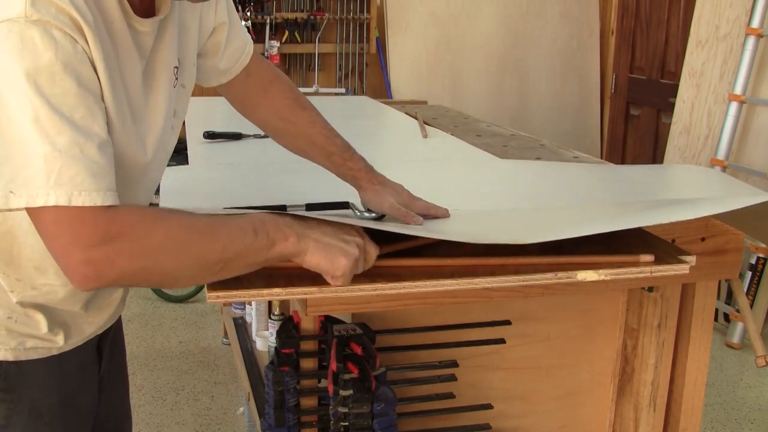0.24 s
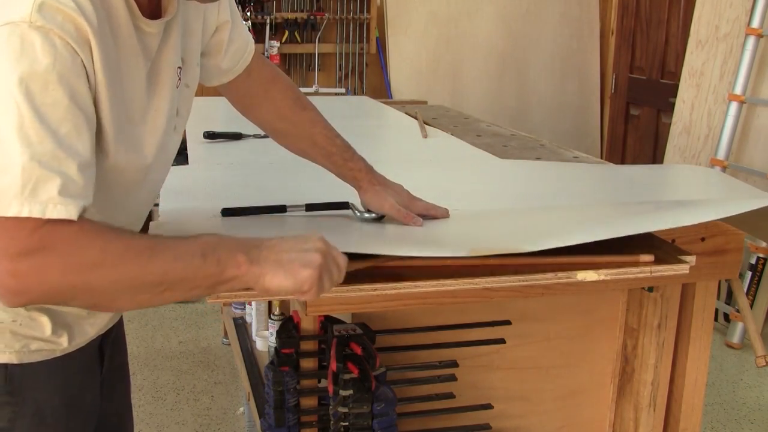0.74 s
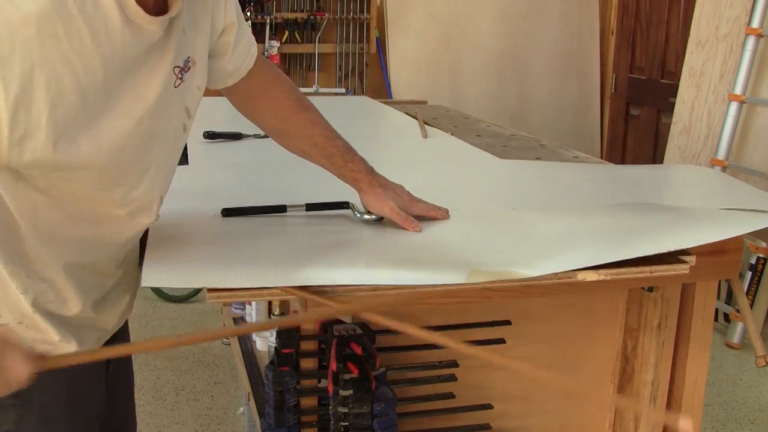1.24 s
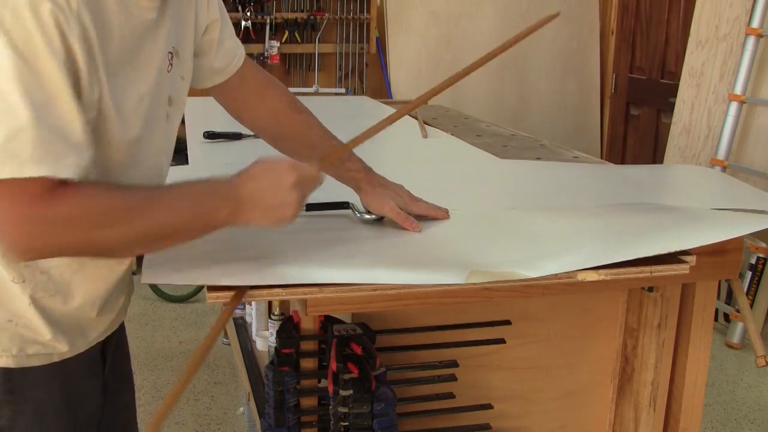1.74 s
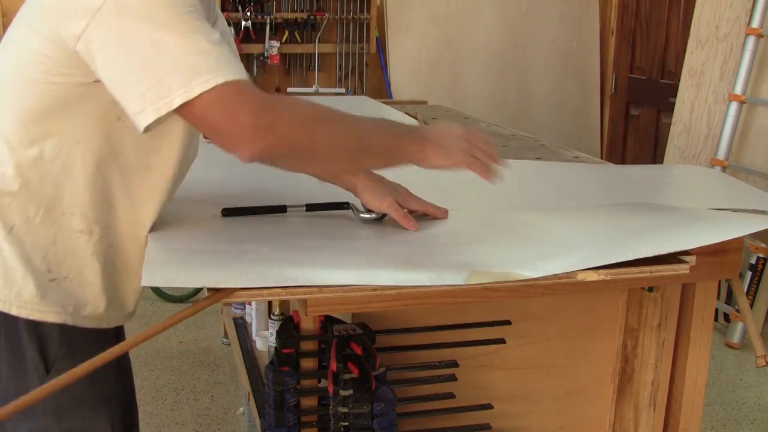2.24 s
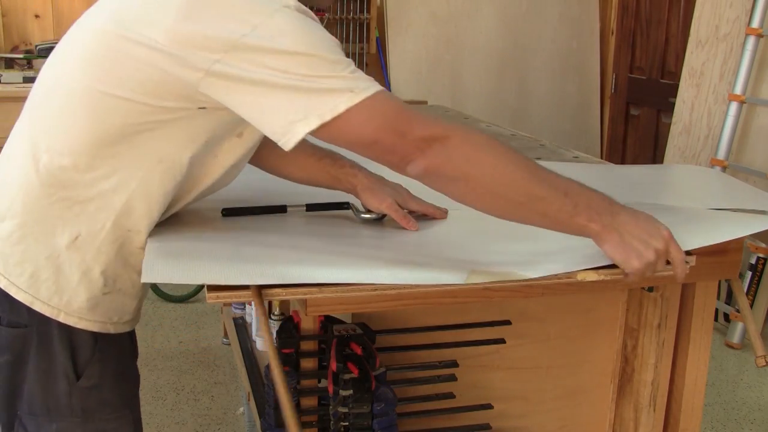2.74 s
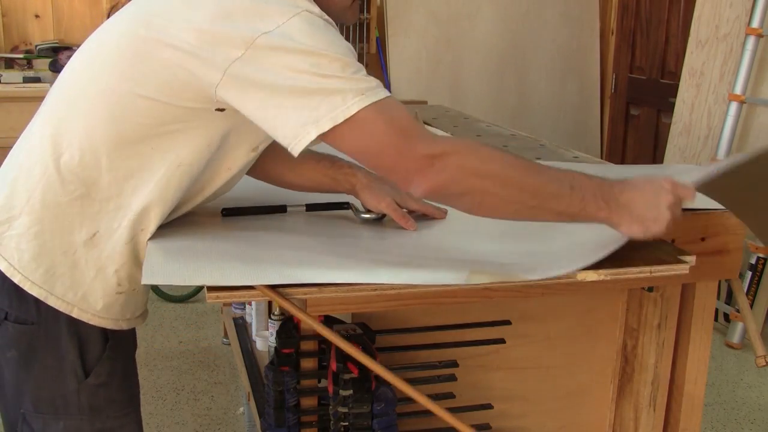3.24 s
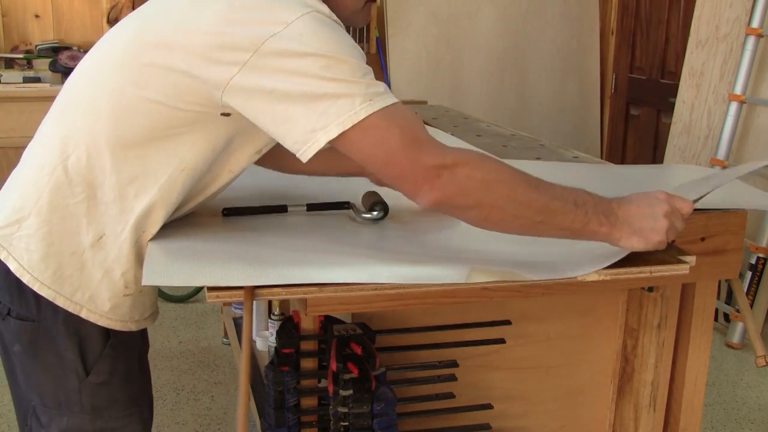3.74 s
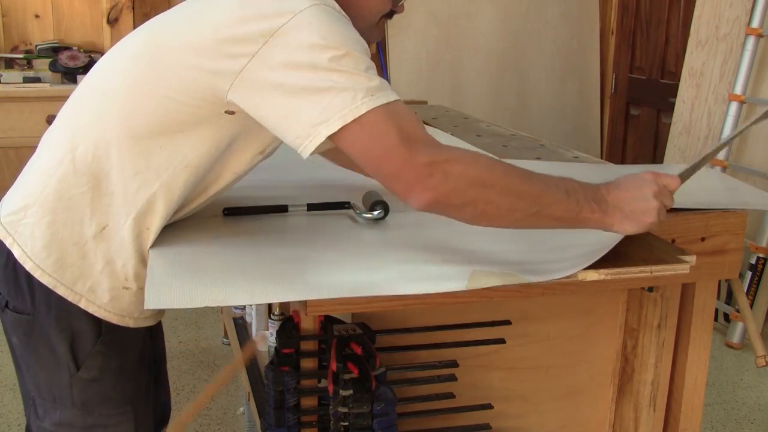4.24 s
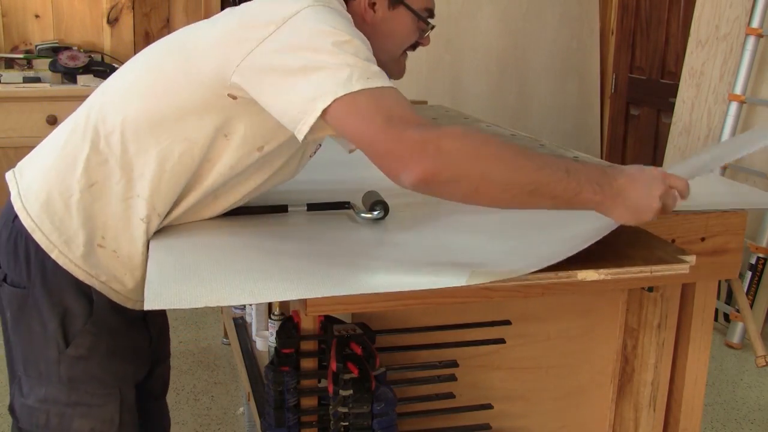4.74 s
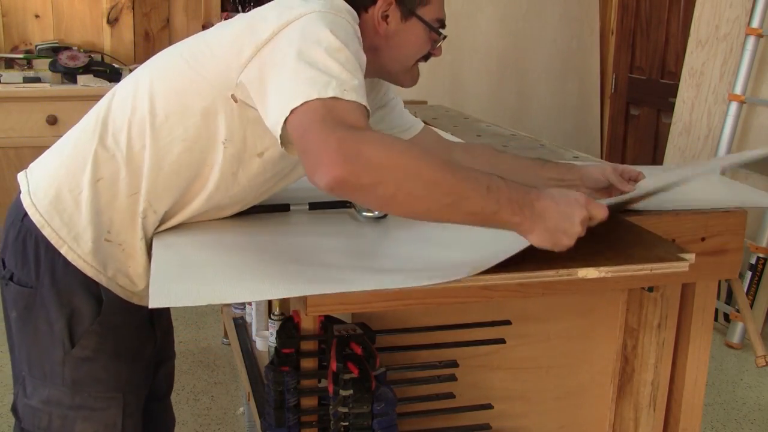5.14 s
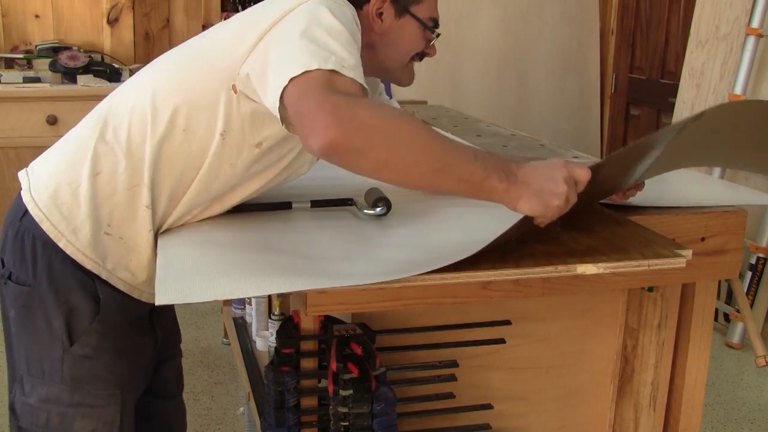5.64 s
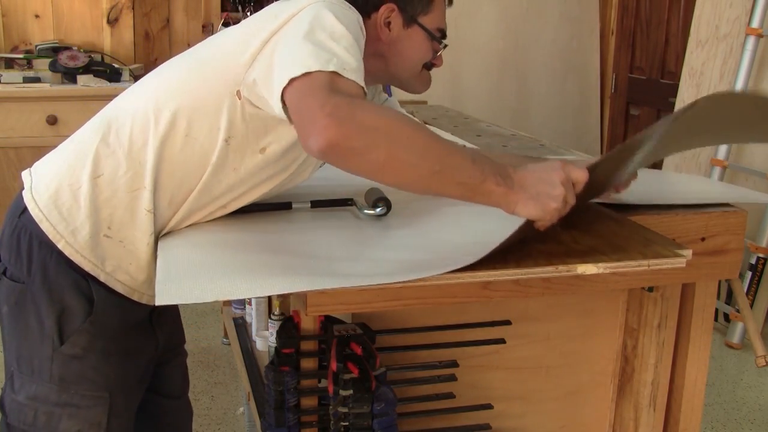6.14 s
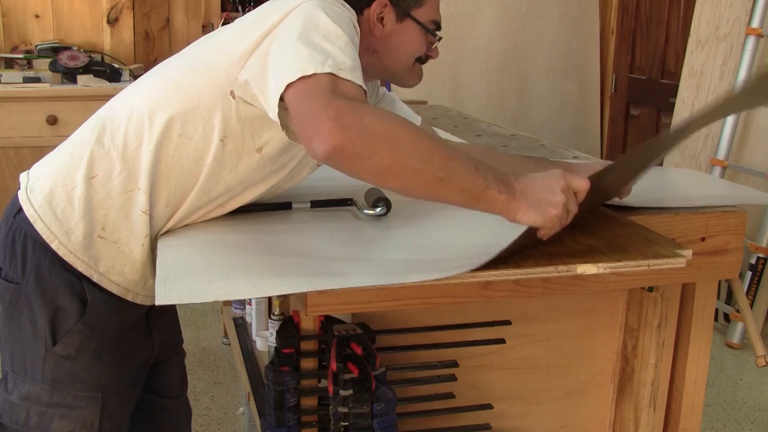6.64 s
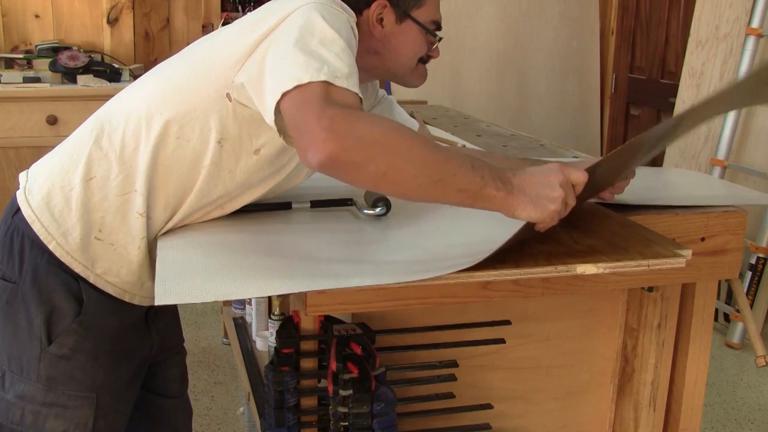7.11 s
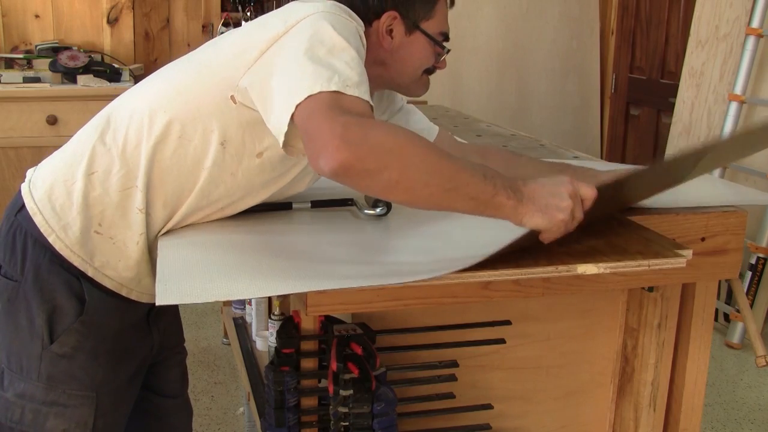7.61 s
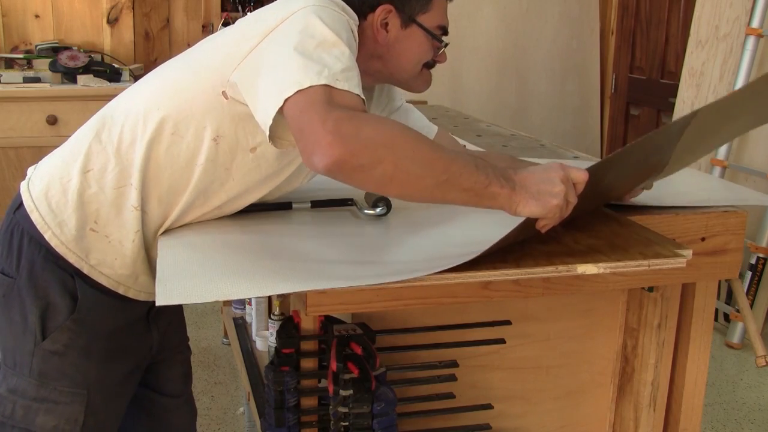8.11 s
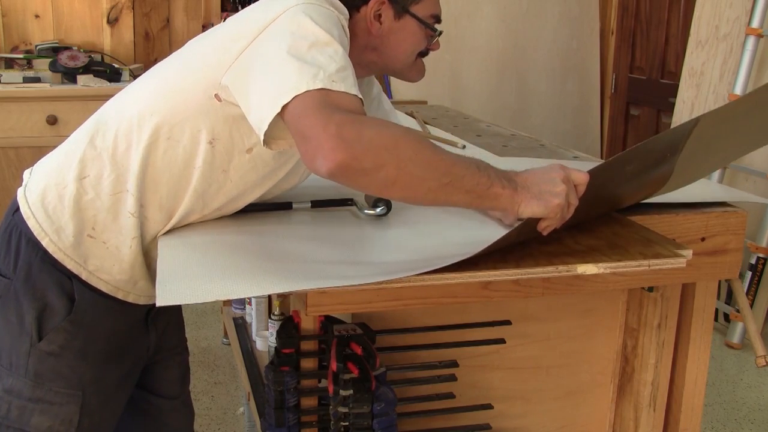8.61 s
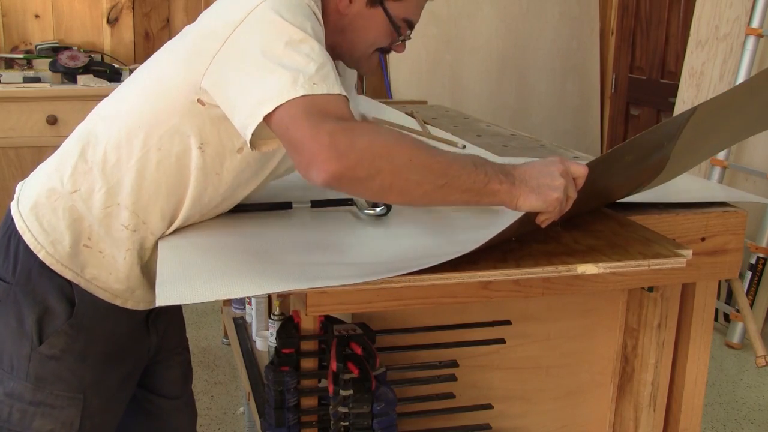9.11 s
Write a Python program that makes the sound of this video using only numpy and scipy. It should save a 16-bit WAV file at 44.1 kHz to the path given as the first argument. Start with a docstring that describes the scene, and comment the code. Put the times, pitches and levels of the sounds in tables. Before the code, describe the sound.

A thin laminate sheet flexes, rumbles and snaps over a worktop while two wooden dowels clatter down in a workshop.

```python
"""A thin plastic laminate sheet is lifted and bent over a worktop: it rumbles, pumps air, buckles with
snaps, slaps its edge down and ticks as tacky glue lets go, while hands swish across its face.
Two wooden dowels drop and ring: one clatters on a bench, the other bounces on the hard floor.
The workshop rings for a second over a quiet room tone, and an automatic gain ducks every loud blow."""
import sys
import numpy as np
from scipy import signal
from scipy.fft import rfft, irfft, next_fast_len
from scipy.io import wavfile
from scipy.ndimage import uniform_filter1d, minimum_filter1d, map_coordinates

SR = 44100
rng = np.random.default_rng(int(sys.argv[2]) if len(sys.argv) > 2 else 0)


def wrap_up_sound(samples):
    """Save the sound to the file named by the first command line argument, as 16-bit audio."""
    columns = np.atleast_2d(samples).T
    # keep every value between -1 and 1, then stretch to whole-number steps
    tamed = np.clip(columns, -1, 1)
    steps = np.round(tamed * 32767).astype(np.int16)
    wavfile.write(sys.argv[1], SR, steps)


N = 413216

# Levels are relative within each layer.
# tone of the flexing sheet and of the air it pumps: (frequency [multiple of the centre], level [dB])
SHEET_SPECTRUM = [(.08, -41), (.2, -10), (.5, 0), (1, 2.5), (2, -2.5), (4, -22), (10, -45.5), (40, -66)]
PUMP_SPECTRUM = [(.2, -41), (.5, 6.5), (1, -10), (1.6, -0.5), (3, -15), (10, -70)]
# the sheet murmurs while held and moved: (time [s], level [dB], rumble centre [Hz])
MURMUR = [(0.0, -34.5, 810), (0.3, -45, 620), (0.49, -58, 650), (1.05, -34, 620), (1.49, -43, 700),
          (1.6, -70, 650), (2.0, -69, 302), (2.5, -43, 300), (3.1, -47.5, 403), (3.84, -33.5, 537),
          (4.57, -31.5, 574), (4.62, -64, 600), (4.82, -52, 650), (4.9, -31.5, 800), (5.75, -36, 770),
          (5.86, -36.5, 300), (6.15, -37.5, 333), (6.7, -27, 500), (7.7, -30.5, 730), (8.26, -31, 544),
          (8.56, -37.5, 800), (8.74, -58, 850), (8.96, -38, 930), (9.37, -58, 700)]
# heaves of the sheet: (peak time [s], level [dB], rumble centre [Hz], rise [s], fall [s], air level [dB])
HEAVES = [(0.222, -32, 740, 0.071, 0.31, -48), (0.712, -26.5, 760, .2, 0.13, -32),
          (0.92, -19.5, 515, 0.054, 0.27, -24.5), (1.27, -16, 750, 0.34, 0.21, -37),
          (3.158, -20, 276, 0.014, 0.22, -45), (3.415, -10, 830, 0.012, 0.33, -46),
          (3.5, -17, 594, .07, 0.4, -25), (3.6, -7, 583, .14, .11, -30),
          (4.038, -26.5, 840, 0.058, 0.11, -42), (4.16, -7, 480, 0.028, 0.26, -41),
          (4.33, -16, 440, 0.28, 0.14, -25), (4.88, -23, 800, 0.23, 0.14, -38.5),
          (5.08, -24.5, 920, 0.087, 0.039, -60), (5.21, -30.5, 660, 0.22, .06, -43),
          (5.99, -28, 330, 0.052, 0.25, -44), (6.26, -14.5, 440, 0.11, 0.72, -22),
          (6.43, -11, 322, 0.045, 0.25, -19), (6.56, -9, 378, 0.022, 0.29, -28),
          (6.83, -3, 634, 0.045, 0.15, -36), (6.92, -4, 500, .2, 0.15, -43),
          (7.18, -11, 610, 0.069, .2, -38), (7.28, -10, 480, 0.36, 0.29, -45),
          (7.412, -4, 650, 0.027, 0.38, -36), (7.86, -9, 576, 0.037, 0.31, -27),
          (8.04, -13, 456, 0.48, 0.19, -36), (8.35, -29, 944, .06, 0.42, -58),
          (9.15, -34.5, 725, 0.042, 0.21, -65)]
# the sheet buckles or is knocked: (time [s], level [dB], pitch [Hz])
SNAPS = [(0.025, -7, 1590), (0.546, -18, 1990), (0.667, -15, 875), (0.949, -18, 626), (1.196, -3.5, 1433),
         (1.274, -10, 690), (2.008, -31, 151), (4.145, -0.5, 424), (4.283, -15, 400), (4.508, -21, 470),
         (4.857, -7.5, 2375), (5.964, -13, 305), (6.227, -8, 505), (6.284, -1, 460), (6.548, -3, 317),
         (6.699, -2, 530), (6.806, 3, 492), (7.169, -6, 696), (7.423, 6, 794), (7.459, 4, 504),
         (7.854, -8, 910), (8.979, -14, 925), (8.999, -11, 1060), (9.157, -18, 970)]
# ticks of edges and of glue letting go: (time [s], level [dB], sizzle against that level [dB])
TICKS = [(0.187, -18, -8), (0.3938, -18.5, -9), (0.51, -19.5, 4), (0.5437, -10.5, -1), (0.891, -21, -29),
         (1.273, -7, -16), (2.1, -36, -8), (3.152, -26, -18), (3.1983, -8, -15.5), (3.3963, -33, -23),
         (3.9458, -27.5, -1), (3.9865, -16.5, -9), (4.117, -21, -11), (4.2766, -13.5, -23),
         (4.4817, -19, -7), (5.5994, -14, -6), (5.8514, -22.5, -10), (5.964, -21, -8), (5.982, -15.5, -9),
         (6.097, -24.5, 0), (6.2197, -13.5, -9.5), (6.34, -21, -4), (6.4872, -25, -16),
         (6.5466, -24.5, -7.5), (6.657, -37, 10), (6.712, -28, -8), (6.764, -23, -7), (6.8364, -16, -27),
         (6.9566, -18.5, -10), (7.0583, -10, -11), (7.1803, -23.5, 1), (7.21, -10.5, -11),
         (7.312, -13, -11), (7.336, -16, -9), (7.422, -1, -15), (7.7304, -22, -7), (7.7522, -20, -10),
         (7.8506, -21.5, -11), (8.2425, -24, -7)]
# stretches of peeling glue: (start [s], end [s])
PEEL_SPANS = [(3.052, 4.1), (5.852, 8.3)]
# tone of a tick's body, of its sizzle and of a hand stroke: (frequency [Hz], level [dB])
TICK_SPECTRUM = [(600, 4), (2000, 6.5), (4500, -1.5), (7000, 3), (9000, -11.5), (16000, -40)]
SIZZLE_SPECTRUM = [(4000, -38), (8000, -2.5), (11000, 4), (14000, -6), (16000, -16)]
STROKE_SPECTRUM = [(350, -38), (600, -21), (800, 1), (997, 12), (1110, 5), (1400, 12.5), (2530, 7.5),
                   (3290, 7.5), (4440, -0.5), (5840, 0.5), (11000, 1), (14400, -8.5), (15900, -17)]
# skin and wood slide lightly on the smooth face: (time [s], level [dB], pressure [0-1])
RUBBING = [(0.0, -21.5, 0.32), (0.338, -46, 0.54), (0.66, -37.5, 0.89), (0.948, -48.5, .77),
           (1.214, -29, 0.94), (1.378, -53, 1), (1.55, -57, 1), (3.04, -62, 0.7), (3.13, -45.5, 0.76),
           (3.3, -43.5, 1), (4.05, -37.5, 0.83), (4.59, -31.5, 0.77), (4.62, -66, 1), (5.75, -45, 1),
           (5.95, -42, 0.93), (6.21, -39, 0.93), (6.81, -50.5, 0.9), (7.3, -31.5, 0.75), (7.44, -62, 0.9),
           (7.85, -37.5, 0.4), (8.07, -50, 0.03), (8.3, -44.5, 1), (9.37, -54, 0.96)]
# palm swishes: (peak time [s], level [dB], pressure [0-1], rise [s], fall [s])
SWISHES = [(8.45, -30, 0.42, 0.14, 0.11), (8.59, -23.5, 0.31, 0.15, 0.081), (8.91, -19.5, 0.4, 0.18, 0.18),
           (9.085, -17.5, .28, 0.093, 0.13)]
# hits of the sheet's edge and of each dowel: (time [s], ring level [dB], crack level [dB])
EDGE_HITS = [(.893, -39, -14), (3.398, -41, 1), (6.698, -21, -14.5), (7.172, -34, -25), (7.855, -32, -37),
             (8.282, -15.5, -10.5)]
BENCH_HITS = [(2.272, -36, -1), (2.286, -27, 13.5), (2.293, -28, 2), (2.36, -26, 2), (2.42, -22, -1),
              (2.48, -6.5, -6.5), (2.66, -26, -25), (2.71, -41, -22), (2.77, -58, -32)]
FLOOR_HITS = [(4.595, -11, 11), (4.651, -5, 19), (4.693, -1, 12), (4.78, -9.5, -21), (4.815, -29, -5),
              (5.052, -0.5, 7.5), (5.07, -9, -10), (5.099, -7, 12.5), (5.13, -32, 8.5), (5.16, -11.5, -4.5),
              (5.21, -23, -22), (5.3, -15.5, -22.5), (5.457, -7.5, -9), (5.48, -16, -10), (5.56, -25, -25),
              (5.671, -18, -23), (5.738, -27, -41)]
# bending modes of the edge and of each dowel: (frequency [Hz], bandwidth [Hz], level [dB])
EDGE_MODES = [(600, 130, -12), (1014, 77, 3.5), (1180, 120, -8), (1235, 17, -1), (1490, 33, -28),
              (1810, 55, 3.5)]
BENCH_DOWEL_MODES = [(436, 57, -2), (802, 160, -8), (2540, 80, -12), (3940, 60, -13), (4650, 140, -14),
                     (5070, 75, -12), (6140, 83, -12), (6970, 120, -14), (8030, 200, -20), (9520, 120, -20)]
FLOOR_DOWEL_MODES = [(730, 22, -10), (1176, 30, -8), (1747, 22, 0), (2329, 22, 0), (2410, 22, 0),
                     (3007, 25, -3), (3132, 25, 0), (3242, 25, -8), (3707, 25, -6), (3912, 35, -4),
                     (4549, 40, -8), (4797, 40, -9), (5325, 45, -8), (5700, 45, -11), (6152, 45, -10),
                     (6660, 70, -12), (7040, 70, -13), (7660, 90, -13), (8840, 140, -14), (9670, 150, -16),
                     (10700, 110, -20)]
# tone of the crack that opens each hit: (frequency [Hz], level [dB])
EDGE_CRACK = [(150, -54), (500, -4), (1000, 4.5), (1900, -3), (2600, -8.5), (4000, -26), (8000, -30),
              (16000, -44)]
BENCH_CRACK = [(150, -24), (400, -2), (800, 7), (2500, 5.5), (5000, 1), (10000, -9.5), (16000, -40)]
FLOOR_CRACK = [(300, -54), (1000, -14), (2200, 5.5), (5000, 10.5), (9000, 10), (12000, 1), (16000, -45)]
# the workshop's reverb: (frequency [Hz], time to fall 60 dB [s])
REVERB_T60 = [(150, 1), (500, 1), (1500, 0.99), (4000, 0.73), (10000, 0.29), (16000, 0.77)]
# the quiet workshop: (frequency [Hz], level [dB])
ROOM_TONE_SPECTRUM = [(15, -72), (25, -46), (96, -10), (145, -9.5), (180, -4.5), (438, -8.5), (884, -13),
                      (1010, -12.5), (2210, -26.5), (3230, -24), (4120, -31.5), (10000, -36), (15900, -61)]
# stereo width of diffuse sound: (frequency [Hz], side minus mid [dB])
STEREO_WIDTH = [(60, -58), (110, -22), (200, -11), (380, -8), (700, -7), (1290, -7.5), (2380, -6.5),
                (4400, -3), (8120, -1.5), (15000, 8)]


def flexing_sheet():
    """Murmur and heaves drive both the rumble of the sheet and the low whoomph of air that it pumps."""
    pump_hz, pump_under_db, pump_fall_ratio = 137, -14, 0.74
    murmur, murmur_hz = automation(MURMUR)
    murmur = murmur * amp(2.04 * wobble(9))
    peak_s, db, heave_hz, rise, fall, air_db = np.transpose(HEAVES)
    heaves = swells(peak_s, db, rise, fall, order=1)
    puffs = swells(peak_s, air_db, rise, fall * pump_fall_ratio, order=1)
    gain, centre_hz = blend(murmur, murmur_hz, heaves, heave_hz)
    air_gain, air_hz = blend(murmur * amp(pump_under_db), pump_hz, puffs, np.full(len(peak_s), pump_hz))
    return rumble(gain, centre_hz, SHEET_SPECTRUM) + rumble(air_gain, air_hz, PUMP_SPECTRUM)


def rumble(gain, centre_hz, spectrum):
    """Dense random buckles excite the sheet; a tighter bend stiffens it and lifts the rumble's pitch."""
    buckles = rng.standard_normal((2, N)) * amp(1.2 * wobble(45))
    hz, t, frames = signal.stft(buckles, SR, nperseg=1024)
    frame_centre = centre_hz[np.minimum((t * SR).astype(int), N - 1)]
    tone = amp(along(spectrum, hz[:, None] / frame_centre))
    # passing modes stand out as narrow patches
    patches = uniform_filter1d(rng.standard_normal(tone.shape), size=2, axis=0)
    patches = uniform_filter1d(patches, size=5, axis=1)
    tone = tone * amp(2.54 * unit(patches))
    mid_side = signal.istft(frames * tone / np.linalg.norm(tone, axis=0), SR, nperseg=1024)[1][:, :N]
    return gain * unit(mid_side)


def buckling_snaps():
    """Each buckle rings a cluster of damped modes around its pitch, with a soft, quick attack."""
    attack_s, t60_s = 0.0015, 0.087
    out, t = np.zeros(N + SR), np.arange(SR // 4) / SR
    attack = 1 - np.exp(-t / attack_s)
    for (s, db, hz), (spread, phase) in zip(SNAPS, rng.standard_normal((len(SNAPS), 2, 40))):
        mode_hz = hz * np.exp(.33 * spread)
        ring = np.sin(2 * np.pi * np.outer(mode_hz, t) + 3 * phase[:, None]).sum(0)
        out[round(s * SR):][:len(t)] += amp(db - 23.5 - 60 * t / t60_s) * attack * ring
    return out[:N]


def edge_slaps():
    """The stiff edge of the sheet slaps the worktop and rings."""
    return struck(EDGE_HITS, EDGE_MODES, EDGE_CRACK, crack_t60_s=0.096)


def peeling_ticks():
    """Edges and glue let go in tiny noise bursts, each with its own amount of sizzle on top."""
    tick_t60_s, faint_t60_s, stutter_s, peels_per_s = 0.015, 0.011, 0.0132, 8.6
    ticks = [(*row, tick_t60_s) for row in TICKS]
    # each tick lets go in steps: two weaker ones follow it
    stutters = [(s + stutter_s * late, db - 2 - 3 * weak, sizzle_db, faint_t60_s)
                for (s, db, sizzle_db), draws in zip(TICKS, rng.random((len(TICKS), 2, 2)))
                for late, weak in draws]
    # faint ticks come by chance while the glue peels
    peels = [(rng.uniform(start, end), rng.normal(-36, 6), -1, faint_t60_s)
             for start, end in PEEL_SPANS for _ in range(round(peels_per_s * (end - start)))]
    envelopes, t = np.zeros((2, N + SR)), np.arange(SR // 8) / SR
    attack = 1 - np.exp(-t / 0.00054)
    for s, db, sizzle_db, t60 in ticks + stutters + peels:
        burst = amp(db - 60 * t / t60) * attack
        envelopes[:, round(s * SR):][:, :len(t)] += burst * amp([[0], [sizzle_db]])
    body = envelopes[0, :N] * coloured(rng.standard_normal(N), TICK_SPECTRUM)
    sizzle = envelopes[1, :N] * coloured(rng.standard_normal(N), SIZZLE_SPECTRUM)
    return amp(-5.5) * body + amp(-1.5) * sizzle


def rubbing_hands():
    """Fine grain hisses under the hands; more pressure brings out the duller body of the stroke."""
    peak_s, db, push, rise, fall = np.transpose(SWISHES)
    gain, pressure = blend(*automation(RUBBING), swells(peak_s, db, rise, fall, order=2), push)
    grain = amp(1.3 * wobble(300) + .8 * wobble(13))
    stroke = coloured(rng.standard_normal((2, N)) * grain, STROKE_SPECTRUM)
    body = filtered(stroke, lambda hz: 1 / (1 + (hz / 4000) ** 6))
    hiss = stroke - body
    return gain * amp(-1.0) * (hiss + amp(26.4 * pressure - 19) * body)


def dowel_on_bench():
    """A dowel clatters on the bench: a tip landing mostly cracks, a flat landing mostly rings."""
    return struck(BENCH_HITS, BENCH_DOWEL_MODES, BENCH_CRACK, crack_t60_s=0.028)


def dowel_on_floor():
    """A dowel bounces on the hard floor with a brighter crack and a longer ring."""
    return struck(FLOOR_HITS, FLOOR_DOWEL_MODES, FLOOR_CRACK, crack_t60_s=0.017)


def struck(hits, modes, crack_spectrum, crack_t60_s):
    """Every hit cracks and rings the modes at new strengths; returns the direct sound and its reverb."""
    direct, sends, t = np.zeros(N + SR), np.zeros((3, N + SR)), np.arange(SR // 3) / SR
    hz, width, mode_db = np.transpose(modes)
    partials = np.exp(np.outer(2j * np.pi * hz - np.pi * width, t))
    attack = 1 - np.exp(-t / 0.00053)  # the contact yields for a moment
    treble_octaves = np.maximum(np.log2(hz / 2000), 0)
    crack_tone = amp(along(crack_spectrum, np.fft.rfftfreq(len(t), 1 / SR)))
    for k, (s, ring_db, crack_db) in enumerate(hits):
        dull_db = 0.17 * min(ring_db, 0) * treble_octaves  # softer hits lose treble
        # a wider mode needs more swing for the same spectral height
        swing = amp(mode_db + ring_db + dull_db + rng.normal(0, 2, len(hz))) * width / 30
        phases = np.exp(2j * np.pi * rng.random(len(hz)))
        ring = attack * np.real(swing * phases @ partials)
        noise = coloured(rng.standard_normal(len(t)), crack_spectrum)
        crack = attack * amp(crack_db - 60 * t / crack_t60_s) * noise
        # the room is fed the crack with its colour evened out, so its reverb rings without narrow peaks
        diffuse = irfft(np.exp(1j * np.angle(rfft(crack))) * crack_tone, len(t)) * amp(-60 * t / .15)
        diffuse *= np.linalg.norm(crack) / np.linalg.norm(diffuse)
        direct[round(s * SR):][:len(t)] += ring + crack
        sends[k % len(sends), round(s * SR):][:len(t)] += ring + diffuse
    # successive hits land on different spots, so the room answers each differently
    return direct[:N], sum(workshop_reverb(send[:N]) for send in sends)


def workshop_reverb(send):
    """The room answers with a stereo tail in which each frequency dies at its own speed."""
    hz, t, frames = signal.stft(rng.standard_normal((2, SR + SR // 2)), SR, nperseg=256)
    decay = amp(-60 * t / along(REVERB_T60, hz)[:, None])
    tail = signal.istft(frames * decay, SR, nperseg=256)[1]
    predelayed = np.pad(send, (250, 0))[None]
    wet = signal.fftconvolve(predelayed, tail / np.linalg.norm(tail[0]), axes=1)[:, :N]
    return stereo(wet, narrower_db=5)


def room_tone():
    """The quiet workshop: a wide, steady bed of dark noise."""
    return stereo(coloured(rng.standard_normal((2, N)), ROOM_TONE_SPECTRUM), narrower_db=-7.5)


def amp(db):
    return 10 ** (np.asarray(db) / 20)


def unit(x):
    return x / np.sqrt(np.mean(x ** 2) + 1e-20)


def along(points, hz):
    """Read (frequency, value) points on a log frequency axis."""
    knots, values = np.transpose(points)
    return np.interp(np.log(hz + 1e-3), np.log(knots), values)


def automation(rows):
    """Gain and control curves through (time, level, control) points."""
    s, db, control = np.transpose(rows)
    t = np.arange(N) / SR
    return amp(np.interp(t, s, db)), np.interp(t, s, control)


def swells(peak_s, db, rise_s, fall_s, order):
    """A gain row per swell, every 32 samples; rise and fall span 20 dB. Order 1 is pointed, 2 rounded."""
    late = np.arange(0, N, 32) / SR - peak_s[:, None]
    span = np.where(late < 0, rise_s[:, None], fall_s[:, None]) + 1e-3
    return amp(db[:, None] - 20 * (np.abs(late) / span) ** order)


def blend(bed, bed_control, swell_gains, swell_controls):
    """Lay swells over a bed: powers add, and the loudest part leads the control."""
    per_sample = lambda v: np.interp(np.arange(N), np.arange(0, N, 32), v)
    power = bed ** 2 + per_sample((swell_gains ** 2).sum(0))
    control = (bed ** 2 * bed_control + per_sample(swell_controls @ swell_gains ** 2)) / power
    return np.sqrt(power), control


def wobble(knots_per_s):
    """A smooth random curve."""
    knots = rng.standard_normal(int(N * knots_per_s / SR) + 4)
    return map_coordinates(knots, [np.arange(N) * knots_per_s / SR])


def filtered(x, response):
    """Equalise x with a gain given as a function of frequency."""
    size = next_fast_len(x.shape[-1] + 8192)
    return irfft(rfft(x, size) * response(np.fft.rfftfreq(size, 1 / SR)), size)[..., :x.shape[-1]]


def coloured(x, spectrum):
    """Shape x with a spectrum table, at unit RMS."""
    return unit(filtered(x, lambda hz: amp(along(spectrum, hz))))


def stereo(mid_side, narrower_db):
    """Left and right from a mid sound and an unrelated side sound."""
    mid, side = mid_side
    side = filtered(side, lambda hz: amp(along(STEREO_WIDTH, hz) - narrower_db))
    return np.array([mid + side, mid - side])


def scene():
    """Sheet, hands and dowels up front, leaning slightly right; reverb and room tone behind."""
    sheet, hands = flexing_sheet(), rubbing_hands()
    snaps, ticks = buckling_snaps(), peeling_ticks()
    bench, bench_wet = dowel_on_bench()
    floor, floor_wet = dowel_on_floor()
    slaps, slaps_wet = edge_slaps()
    background = amp(-49) * room_tone()
    direct = stereo(sheet, narrower_db=10.5) + stereo(hands, narrower_db=11.5)
    direct += snaps + ticks + bench + floor + slaps
    send = amp(-13.5) * sheet[0] + amp(-12.5) * hands[0] + amp(-6) * snaps + amp(-13) * ticks
    wet = workshop_reverb(send) + amp(0.8) * bench_wet + amp(-0.5) * floor_wet + amp(-3.1) * slaps_wet
    return (direct + wet) * amp([[-.3], [.3]]) + background


def record(dry):
    """The microphone thins the bass, loud blows duck the gain, and a limiter catches the first swings."""
    low_cut_hz, high_cut_hz = 75, 15800
    threshold_db, release_db_per_s, ceiling = -12.5, 100, .78
    heard = filtered(dry, lambda hz: (1j * hz / (low_cut_hz + 1j * hz)) ** 3)
    recent_power = uniform_filter1d(np.mean(heard ** 2, 0), size=301, origin=150)
    recent_db = 10 * np.log10(np.abs(recent_power) + 1e-12)
    duck_db = np.minimum(threshold_db - recent_db, 0)
    # the gain drops within milliseconds and climbs back at a steady pace
    climb_db = release_db_per_s * np.arange(N) / SR
    ducked = heard * amp(np.minimum.accumulate(duck_db - climb_db) + climb_db)
    limiter_gain = np.minimum(ceiling / (np.abs(ducked).max(0) + 1e-9), 1)
    limited = ducked * uniform_filter1d(minimum_filter1d(limiter_gain, size=61), size=41)
    return filtered(limited, lambda hz: hz < high_cut_hz)


dry = scene()
out = record(dry)
wrap_up_sound(out)
```